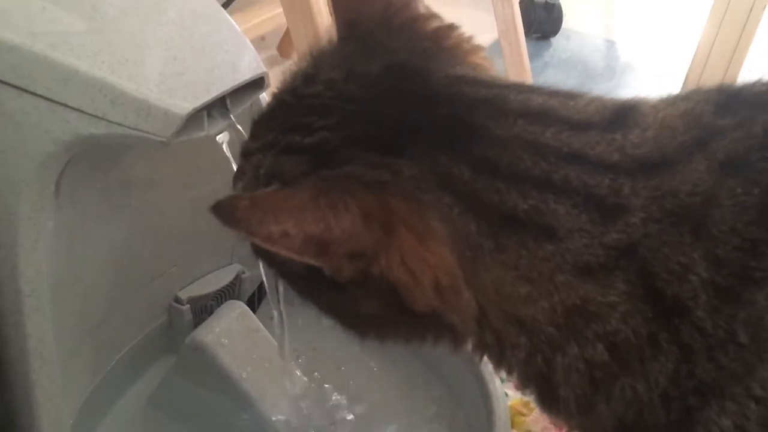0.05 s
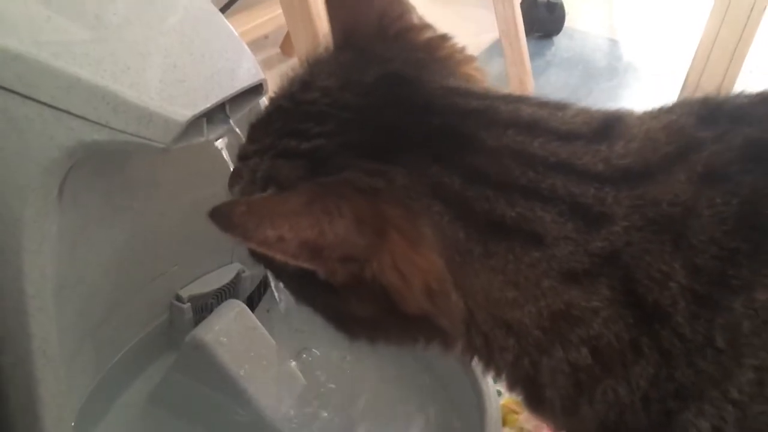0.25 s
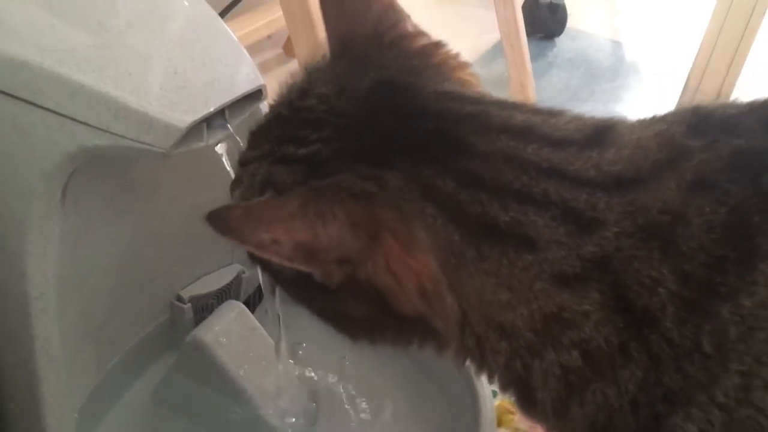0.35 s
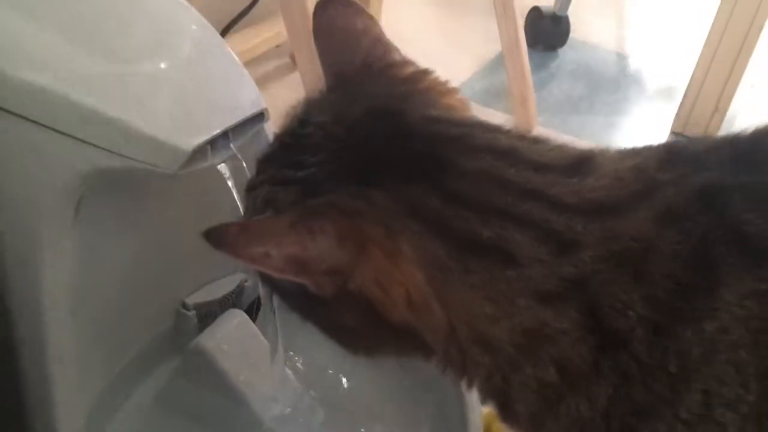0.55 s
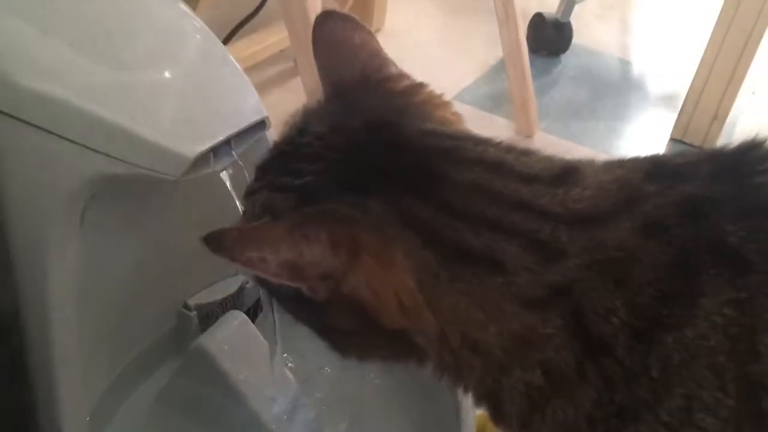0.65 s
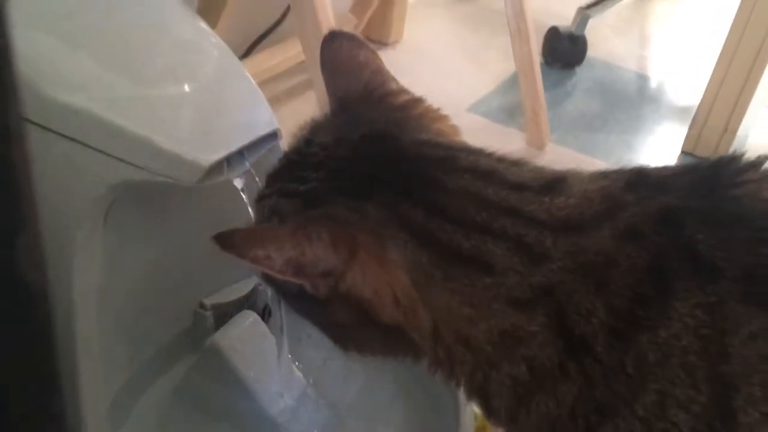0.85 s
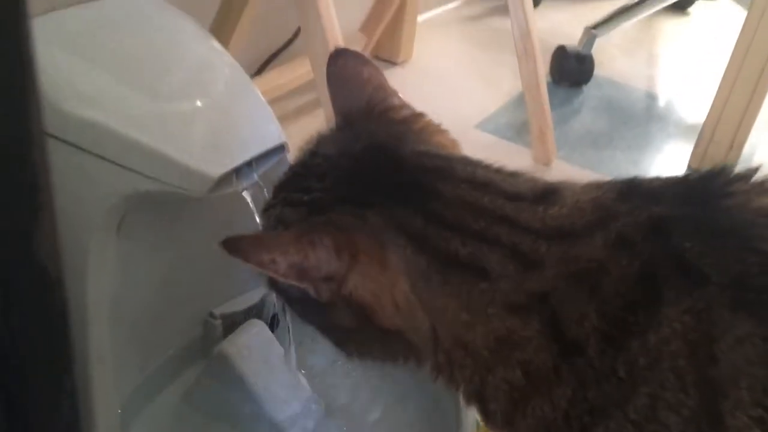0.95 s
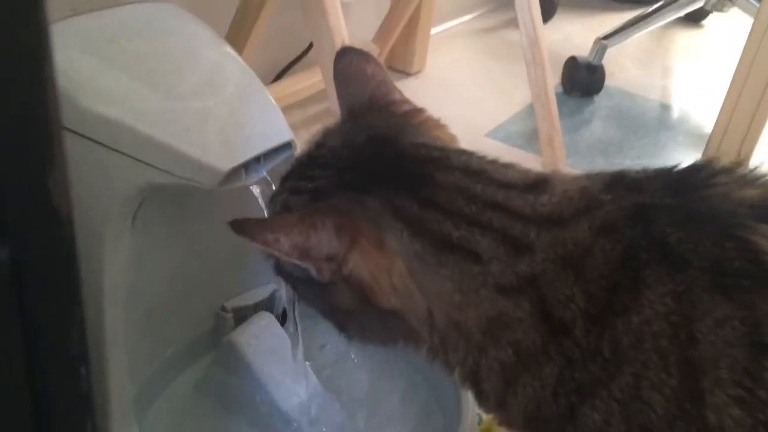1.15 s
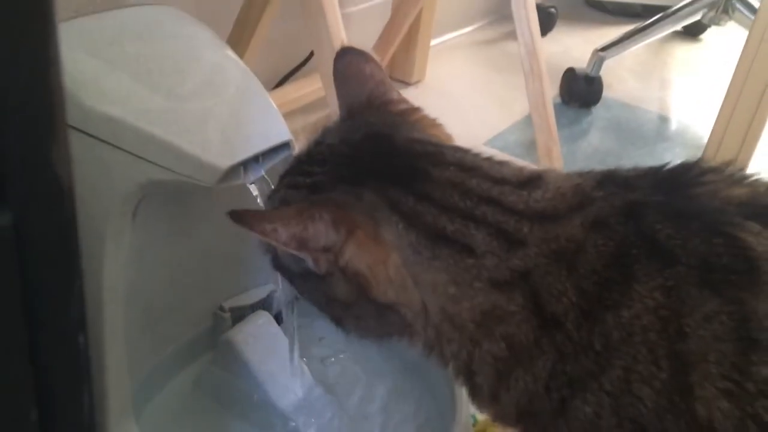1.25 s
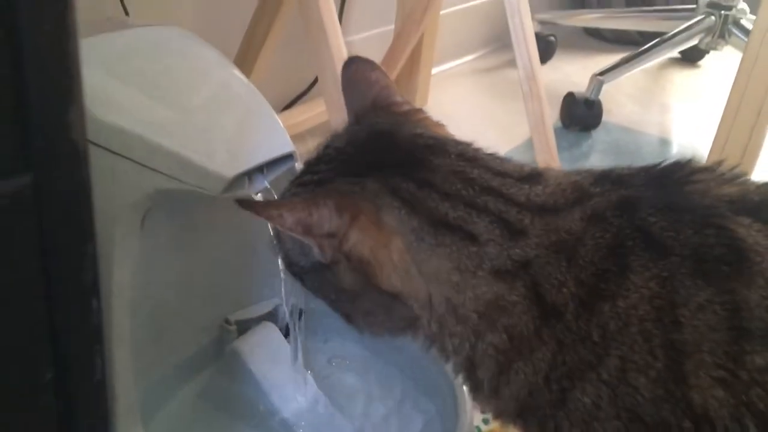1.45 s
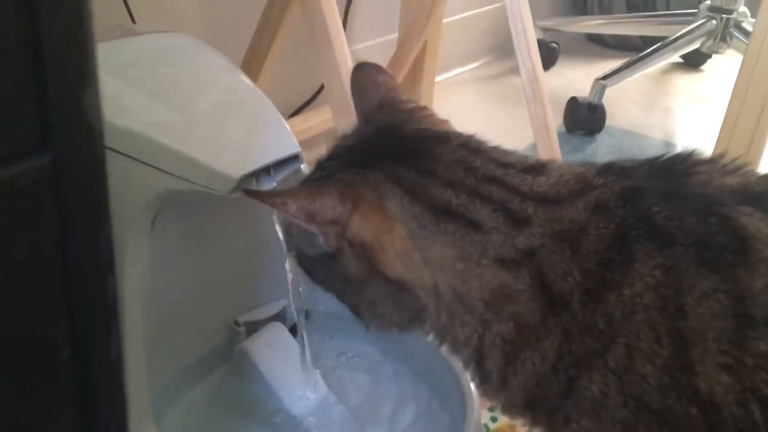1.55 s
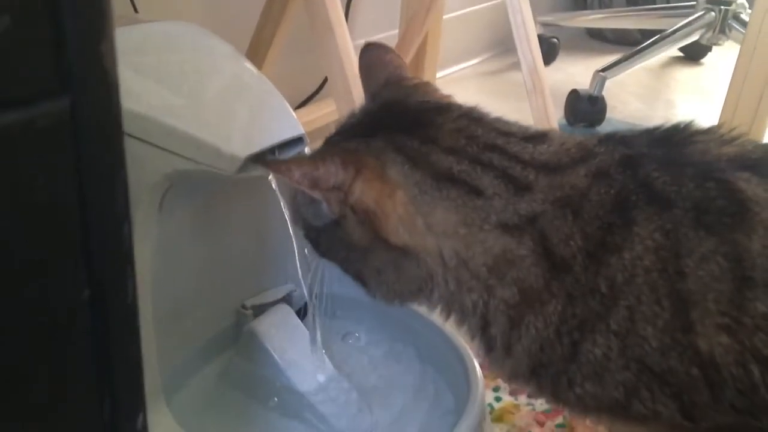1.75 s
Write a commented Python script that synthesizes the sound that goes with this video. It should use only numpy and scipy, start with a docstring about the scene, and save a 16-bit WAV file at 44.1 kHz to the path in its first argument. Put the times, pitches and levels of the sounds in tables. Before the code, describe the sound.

A cat laps wetly at the thin trickling stream of a pet fountain.

```python
"""Cat at a pet fountain

Close up in a small room, a cat laps at a thin stream. Its tongue snaps, crackles and rings a mouth
cavity that falls in pitch as it opens. The stream trickles into the plastic basin in tiny bubbles,
the pump hums underneath, and a few dull knocks land right at the microphone."""
import sys
import numpy as np
from scipy import signal
from scipy.fft import rfft, irfft
from scipy.io import wavfile

SR = 44100
rng = np.random.default_rng(int(sys.argv[2]) if len(sys.argv) > 2 else 0)


def inscribe(sig):
    """Save sig as 16-bit PCM at rate SR to the path in sys.argv[1].

    A 1-D sig is mono; a 2-D sig holds one channel per row.
    Samples are clipped to [-1, 1] before scaling.
    """
    pcm = np.round(np.clip(np.atleast_2d(sig).T, -1, 1) * 32767)
    wavfile.write(sys.argv[1], SR, pcm.astype(np.int16))


N = 79380
T = np.arange(N) / SR
SHORT = T[:4410]  # 0.1 s, the span of one small event


def tongue_smacks(pitch_fall=0.33, open_s=0.0089, attack_s=0.0022, roughness=0.29):
    """The tongue snaps free and rings the wet, opening mouth; the housing thumps faintly."""
    # Smacks of the tongue: start_s, cavity_start_hz, cavity_db, cavity_decay_s, snap_db
    smacks = [(0.1031, 1623, -15.5, 0.0063, -7.5), (0.2535, 1248, -40, .006, -26.5),
              (0.2964, 1370, -24.5, 0.0084, -31.5), (0.3605, 1358, -19.5, 0.012, -21.5),
              (0.451, 1800, -38.5, .008, -35), (0.644, 1363, -38, 0.0094, -59),
              (0.763, 1248, -44, 0.0062, -57), (0.953, 1846, -45, 0.0046, -61),
              (1.164, 1573, -35, 0.007, -53), (1.3372, 1344, -35, 0.0082, -53),
              (1.389, 1425, -41.5, 0.012, -64), (1.665, 2035, -47, 0.0085, -45),
              (1.7945, 1320, -34, 0.0043, -38.5)]
    # Ring of the snap: pitch_hz, level_db, decay_s
    snap_modes = [(2090, -9.5, 0.00084), (3830, -10.5, 0.0014), (4450, 1.5, 0.00051), (5610, -13.5, 0.0035),
                  (9700, -31, 0.0014), (12870, -8, 0.0015), (14550, -9.5, 0.0013)]
    out = np.zeros(N)
    snap = sum(undb(db) * ring(hz, decay, 0.0001) for hz, db, decay in snap_modes)
    thump = undb(-31.5) * ring(153, decay_s=0.035, attack_s=0.0047, t=T)
    lowpass = signal.butter(2, 530, fs=SR, output="sos")
    for start, hz, cavity_db, decay, snap_db in smacks:
        pitch = falling(hz, pitch_fall, open_s)
        flutter = level(signal.sosfilt(lowpass, rng.standard_normal(len(SHORT))), 0)
        turbulence = flutter * ring(pitch, 0.018, attack_s)
        cavity = ring(pitch, decay, attack_s) + roughness * turbulence
        add(out, start, undb(cavity_db) * cavity + undb(snap_db) * snap)
        add(out, start, undb(cavity_db) * thump)
    return out


def crackles():
    """Brief bright crackles: wet ticks of tongue and spray, and the sharp clicks of the knocks."""
    # Ticks and clicks: start_s, treble_db, middle_db, decay_s
    ticks = [(0.029, -46, -48, 0.005), (0.062, -51, -59, 0.00097), (0.073, -30.5, -63, 0.0054),
             (0.1044, -17, -18.5, 0.0025), (0.113, -38, -47, 0.0032), (0.123, -42, -36, 0.0047),
             (0.140, -38, -53, 0.0015), (0.174, -35.5, -46, 0.00063), (0.181, -42.5, -39, .005),
             (0.2512, -32, -64, 0.0034), (0.2550, -30, -42, 0.0038), (0.263, -51, -36.5, 0.0043),
             (0.269, -37, -47, 0.0028), (0.313, -63, -59, .002), (0.322, -44, -39, 0.0016),
             (0.327, -35, -42, .003), (0.3288, -23.5, -37, .002), (0.3339, -28.5, -26, 0.0014),
             (0.340, -40, -41, 0.0078), (0.355, -48, -37.5, 0.0024), (0.361, -25.5, -26.5, 0.0053),
             (0.3752, -26.5, -51, 0.00095), (0.379, -35, -32.5, 0.0036), (0.418, -49, -41, 0.02),
             (0.4395, -40, -37, 0.001), (0.467, -61, -45, 0.007), (0.603, -31, -56, 0.00065),
             (0.607, -45, -62, .005), (0.6431, -37, -42.5, .006), (0.7027, -38, -57, 0.0015),
             (0.714, -42.5, -42, 0.0045), (0.796, -45.5, -45.5, 0.0052), (0.835, -45, -45, .003),
             (0.8722, -36, -42, .0006), (0.894, -50, -40.5, .006), (0.9257, -37, -46, .0009),
             (0.9308, -37, -55, 0.0022), (1.015, -40.5, -40, .002), (1.037, -44, -45, .004),
             (1.0589, -33, -29, .001), (1.0939, -32, -28, 0.0014), (1.1106, -30, -36, .0007),
             (1.1408, -28, -63, 0.00089), (1.164, -35.5, -49, .002), (1.313, -42, -65, 0.0023),
             (1.338, -43.5, -38, 0.0052), (1.386, -45, -61, .005), (1.4429, -41.5, -45, 0.0056),
             (1.6573, -36.5, -46, 0.0025)]
    # Spectrum of the bright part: frequency_hz, gain_db
    treble_spectrum = [(3000, -37), (7500, -11), (9200, 5), (11300, 5.5), (13000, 2), (16000, 5.5)]
    # Spectrum of the lower part: frequency_hz, gain_db
    middle_spectrum = [(500, -1), (1300, 8.5), (2700, -6.5), (3800, -11), (6000, -2.5), (7500, -3),
                       (12000, -28)]
    treble, middle = np.zeros(N), np.zeros(N)
    for start, treble_db, middle_db, decay in ticks:
        add(treble, start, undb(treble_db) * crackle_burst(8070, 13770, decay))
        add(middle, start, undb(middle_db) * crackle_burst(2140, 6870, decay))
    return colour(treble, treble_spectrum) + colour(middle, middle_spectrum)


def crackle_burst(low_hz, high_hz, decay_s, count=7):
    """A fading cluster of tiny droplet-like pings in hiss."""
    pings = np.zeros(N)
    for k, (jitter, pitch) in enumerate(rng.random((count, 2))):
        delay = 2 * decay_s * (k + jitter) / count
        hz = low_hz + pitch * (high_hz - low_hz)
        add(pings, delay, np.exp(-delay / decay_s) * bubble(hz, cycles=6.7, attack_s=0.00026))
    hiss = rng.standard_normal(len(SHORT)) * np.exp(-SHORT / decay_s)
    return 0.5 * level(pings[:len(SHORT)], 0) * np.std(hiss) + 0.64 * hiss


def plinks():
    """Single bubbles ring clear of the trickle."""
    # Bubbles in the basin: start_s, pitch_hz, level_db
    bubbles = [(0.023, 3420, -39), (0.0495, 5180, -30.5), (0.069, 3670, -27.5), (0.082, 2370, -36),
               (0.323, 6500, -35), (0.326, 6100, -30), (0.338, 3600, -28.5), (0.417, 2210, -40),
               (0.424, 5030, -35), (0.437, 5650, -31), (0.466, 3920, -32.5), (0.468, 4900, -31),
               (0.6805, 4420, -32), (0.805, 3700, -35), (0.9408, 3740, -31), (0.955, 1905, -30.5),
               (0.990, 4970, -36), (1.038, 3680, -37), (1.1402, 9470, -18), (1.208, 2730, -38),
               (1.291, 6100, -29), (1.321, 3660, -34), (1.338, 2920, -34.5), (1.3872, 2990, -33.5),
               (1.541, 5740, -38.5), (1.612, 3680, -43.5), (1.676, 1990, -43), (1.729, 6540, -40)]
    out = np.zeros(N)
    for start, hz, db in bubbles:
        add(out, start, undb(db) * bubble(hz, cycles=7.55, attack_s=0.00036))
    return out


def trickle(bubbles_per_s=3000, ticks_per_s=2500, clusters_per_s=81, cluster_db=2):
    """The stream breaks up unevenly into tiny bubbles, ticks of spray and a soft wash."""
    # Strength of the stream: time_s, gain_db
    flow = [(0, 5.5), (.15, 1), (.235, -8), (.27, -2), (.45, -0.5), (.51, -3), (.61, 0.5), (.67, -8),
            (.725, 2.5), (.785, -5), (.83, 1), (.86, -4), (.96, 0), (1.05, -2), (1.2, -1), (1.44, -4),
            (1.5, -6), (1.63, -7), (1.68, -2), (1.8, -5)]
    # Spectrum of the falling water: frequency_hz, gain_db
    spectrum = [(400, 5), (800, 7), (1150, 3), (2000, -2), (3000, 1), (4000, 0.5), (5000, -5.5), (6000, 1),
                (7600, -3.5), (8800, 0), (10400, -7.5), (12500, 1), (15500, -1.5)]
    wash = colour(rng.standard_normal(N), spectrum)
    tick_sizes = undb(2 * np.minimum(rng.standard_normal(N), 2)) * rng.choice([-1, 1], N)
    spray = colour(tick_sizes * (rng.random(N) < ticks_per_s / SR), spectrum)
    fizz = np.zeros(N)
    for when, pitch, size in rng.random((int(bubbles_per_s * N / SR), 3)):
        hz = 1000 * 15 ** pitch  # 1 to 15 kHz, even across the octaves
        strength = hz * undb(3.5 * min(-np.log(size), np.pi))  # a few stand out
        add(fizz, when * N / SR, strength * bubble(hz, cycles=5.4, attack_s=0.00031))
    water = level(colour(fizz, spectrum), -51.5) + level(spray, -62) + level(wash, -58.5)
    clusters = np.interp(T * clusters_per_s, np.arange(N), rng.standard_normal(N))
    flow_db = np.interp(T, *np.array(flow).T)
    return water * undb(flow_db + cluster_db * clusters)


def sloshes(attack_s=0.0013):
    """Water stirred by the tongue gurgles diffusely for a moment."""
    # Stirs of the water: start_s, level_db, decay_s
    stirs = [(0.256, -45, 0.018), (0.299, -45.5, 0.042), (0.414, -44.5, 0.011), (0.454, -44, 0.029),
             (0.594, -47.5, 0.039), (0.707, -50, 0.073), (0.953, -41.5, 0.013), (1.036, -42.5, 0.0071),
             (1.165, -46.5, 0.0054), (1.209, -45, 0.013), (1.338, -49.5, 0.034), (1.388, -46.5, 0.019),
             (1.444, -44.5, 0.0086), (1.664, -51, 0.024)]
    # Spectrum of the gurgle: frequency_hz, gain_db
    spectrum = [(600, -14), (1100, -2), (1900, 4), (3200, -3), (4500, -16), (9000, -38)]
    swell = np.zeros(N)
    for start, db, decay in stirs:
        add(swell, start, undb(db) * np.exp(-T / decay) * (1 - np.exp(-T / attack_s)))
    return colour(swell * rng.standard_normal(N), spectrum)


def basin(x):
    """The plastic hollow rings along with whatever sounds in it."""
    # Resonances of the basin and its hood: pitch_hz, gain_db, decay_s
    modes = [(732.6, 9, 0.019), (914, -4.5, 0.02), (1079, -2, 0.011), (1166, 1, 0.01), (1338, -1.5, 0.024),
             (1492, 3, 0.026), (1904, 3.5, 0.012)]
    response = sum(undb(db) * 2 / (decay * SR) * ring(hz, decay, 0.0053, T) for hz, db, decay in modes)
    return x + signal.fftconvolve(x, response)[:N]


def knocks():
    """Light knocks right at the microphone: a dry click, a sinking thud and a low sway."""
    # Dull knocks: start_s, click_db, thud_db, thud_start_hz, sway_db
    hits = [(1.0605, -33, -22, 584, -44), (1.0958, -19, -19, 490, -24), (1.1118, -27, -60, 400, -25.5),
            (1.1299, -49, -24, 530, -51)]
    out = np.zeros(N)
    click = ring(1880, 0.00063, 0.00005) + ring(2820, 0.00027, 0.00005)
    sway = ring(97, decay_s=0.0078, attack_s=0.0037)
    for start, click_db, thud_db, hz, sway_db in hits:
        thud = ring(falling(hz, share=0.84, settle_s=0.0035), decay_s=0.003, attack_s=0.0012)
        add(out, start, undb(click_db) * click - undb(thud_db) * thud + undb(sway_db) * sway)
    return out


def pump(waver_db=0.25, rumble_db=-55):
    """The pump's hum wavers slightly over the low rumble of the room."""
    # Partials of the hum: pitch_hz, level_db
    hum = [(56, -67.5), (120, -61), (180, -55.5), (240.3, -57), (301, -65.5), (340, -66.5), (590, -68.5),
           (729, -73.5)]
    # Spectrum of the rumble: frequency_hz, gain_db
    spectrum = [(20, -34), (38, 0.5), (53, 14), (80, 3), (130, 2), (280, 0), (450, -14), (620, 5),
                (900, -50), (2500, -26), (8000, -79)]
    out = level(colour(rng.standard_normal(N), spectrum), rumble_db)
    for hz, db in hum:
        waver = np.interp(T, np.linspace(0, N / SR, 20), rng.standard_normal(20))
        tone = np.sqrt(2) * np.sin(2 * np.pi * (hz * T + rng.random()))
        out += undb(db + waver_db * waver) * tone
    return out


def room(x, split_hz=1500, onset_s=0.0042):
    """Floor and near walls return a short tail that dies soonest in the treble."""
    onset = 1 - np.exp(-(T / onset_s) ** 2)
    tail = np.zeros(N)
    for side, db, t60_s in (("low", -6, 0.15), ("high", -13, 0.047)):
        crossover = signal.butter(2, split_hz, side, fs=SR, output="sos")
        band = signal.sosfilt(crossover, rng.standard_normal(N))
        fade = onset * np.exp(-np.log(1000) * T / t60_s)
        tail += undb(db) * band * fade / np.sqrt(np.sum(fade ** 2))
    return x + signal.fftconvolve(x, tail)[:N]


def bubble(hz, cycles, attack_s):
    """Trapped air rings at one pitch, fading to 1/e over the given cycles."""
    decay_s = cycles / hz
    return ring(hz, decay_s, attack_s, SHORT[:int(2 * np.pi * decay_s * SR)])


def ring(hz, decay_s, attack_s, t=SHORT):
    """A damped oscillation; its pitch may glide."""
    phase = 2 * np.pi * np.cumsum(np.broadcast_to(hz, t.shape)) / SR
    return np.sin(phase) * np.exp(-t / decay_s) * (1 - np.exp(-t / attack_s))


def falling(hz, share, settle_s):
    """A pitch that sinks by a share and settles."""
    return hz * (1 - share * (1 - np.exp(-SHORT / settle_s)))


def colour(x, points):
    """Filter by (frequency_hz, gain_db) points, keeping the power of white noise."""
    hz, db = np.array(points).T
    bins_hz = np.arange(N + 1) * SR / (2 * N)
    gain = undb(np.interp(np.log(bins_hz + 1), np.log(hz), db))
    return irfft(rfft(x, 2 * N) * level(gain, 0))[:N]


def undb(db):
    """Decibels to gain."""
    return 10 ** (np.asarray(db) / 20)


def level(x, db):
    """Scale to an rms level."""
    return x * undb(db) / np.sqrt(np.mean(x ** 2))


def add(out, start_s, x):
    """Mix a sound in at a time."""
    i = int(np.clip(start_s * SR, 0, N - 1))
    out[i:i + len(x)] += x[:N - i]


def scene():
    """One close microphone: cat and water ring the basin and the room, beside the pump and knocks."""
    water = tongue_smacks() + crackles() + plinks() + trickle() + sloshes()
    return (room(basin(water)) + pump() + knocks())[None]


def record(dry, top_hz=16000):
    """The recorder cuts the highest treble steeply."""
    return signal.sosfilt(signal.ellip(8, 0.2, 70, top_hz, fs=SR, output="sos"), dry)


dry = scene()
out = record(dry)
inscribe(out)
```